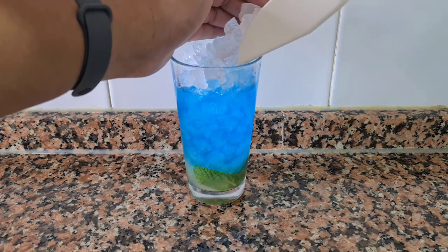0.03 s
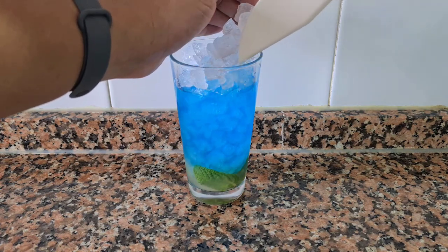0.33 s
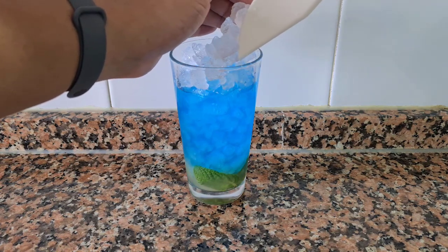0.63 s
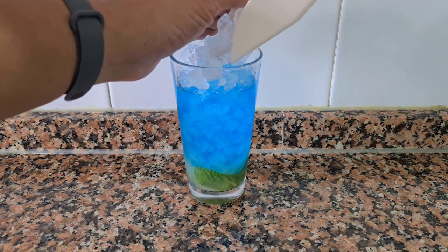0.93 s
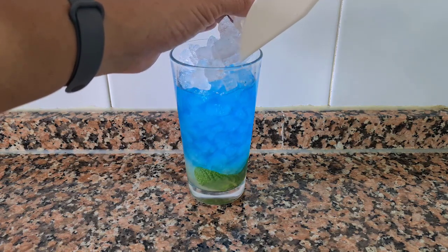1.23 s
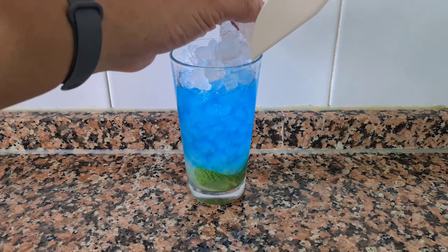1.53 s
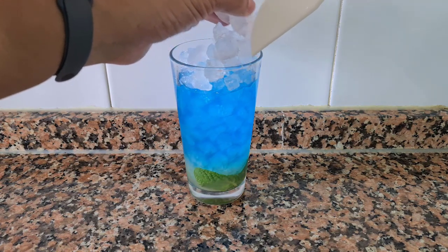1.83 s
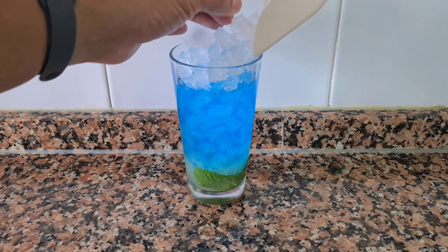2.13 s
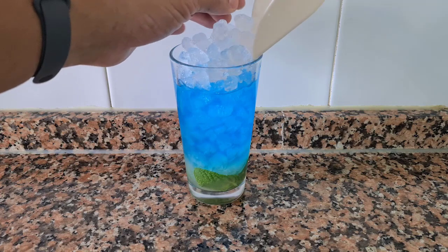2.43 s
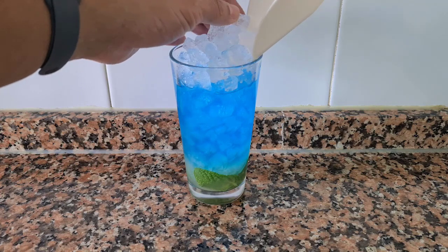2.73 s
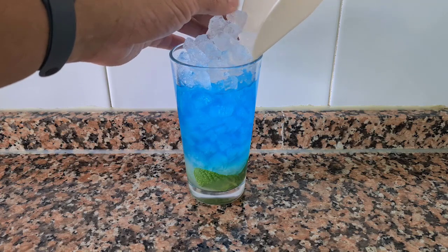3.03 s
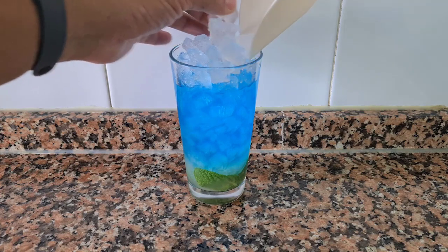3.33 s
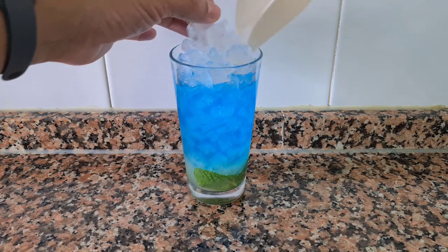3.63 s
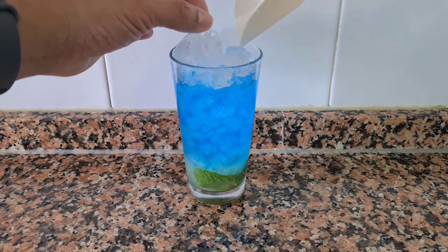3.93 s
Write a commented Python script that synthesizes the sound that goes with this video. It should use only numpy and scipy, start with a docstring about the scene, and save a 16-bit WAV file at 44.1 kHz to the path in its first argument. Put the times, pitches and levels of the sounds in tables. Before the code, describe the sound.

Crushed ice crunches and clatters as a hand pushes it from a scoop onto ice in a glass. Scattered clicks grow into busier clusters with light clinks and soft hollow bumps, heard close up in a quiet kitchen.

```python
"""Crushed ice into a full glass

A hand guides crushed ice from a plastic scoop onto the ice heaped in a glass on a stone counter.
Impacts excite the damped modes of the chunks and, faintly, of the glass. The heap crunches in swarms
of tiny fractures and settles with hollow bumps. A close stereo microphone hears it in a quiet tiled
kitchen."""
import sys
import numpy as np
from scipy import signal
from scipy.fft import rfft, irfft
from scipy.io import wavfile

SR = 44100
rng = np.random.default_rng(int(sys.argv[2]) if len(sys.argv) > 2 else 0)


def put_to_file(sound):
    """Save the sound as 16-bit audio at rate SR, in the file named by the first command-line argument."""
    columns = np.atleast_2d(sound).T  # one column per channel
    safe = np.clip(columns, -1, 1)
    whole_steps = np.round(safe * 32767)
    wavfile.write(sys.argv[1], SR, whole_steps.astype(np.int16))


N = 176400

# modes of the filled glass: f/Hz, level/dB, t60/s
GLASS_MODES = [(1385, -5, .13), (1437, -6, .14), (1629, 2.5, .2), (2010, -4, .12), (2358, -2, .12),
               (2451, 4, .21), (2560, -3.5, .22), (3557, -3, .12)]
# coherence of the two channels for near sounds: f/Hz, coherence (0-1)
COHERENCE = [(200, 0.99), (700, 0.68), (1500, 0.53), (3000, 0.34), (7000, 0), (15000, 0)]
CONTACT_RISE_S = 0.00019


def amp(db):
    """Amplitude ratio of a level in decibels."""
    return 10 ** (np.asarray(db) / 20)


def unit_rms(x):
    """Normalisation to an rms of 1."""
    return x / np.sqrt(np.mean(x ** 2) + 1e-20)


def curve_at(points, hz):
    """Interpolation on a logarithmic frequency axis."""
    f, value = np.transpose(points)
    return np.interp(np.log(hz + 1), np.log(f + 1), value)


def add(mix, start_s, sound):
    """Superposition: a stereo sound joins the mix at its onset."""
    part = mix[:, max(0, round(start_s * SR)):][:, :sound.shape[1]]
    part += sound[:, :part.shape[1]]


def band_rms(x):
    """Parseval's theorem gives the rms in the main clatter band."""
    hz = np.fft.rfftfreq(x.shape[1], 1 / SR)
    band = rfft(x)[:, (hz > 1400) & (hz < 3000)]
    return np.sqrt(2 * np.mean(np.sum(abs(band) ** 2, 1))) / x.shape[1] + 1e-12


def mic_pair(x, right_lag_s=0.000045):
    """Partial coherence: two independent signals blend, as nearby microphones agree in the bass."""
    hz = np.fft.rfftfreq(x.shape[1], 1 / SR)
    independent, right = rfft(x)
    coherence = np.clip(curve_at(COHERENCE, hz), 0, 1)
    left = coherence * right + np.sqrt(1 - coherence ** 2) * independent
    left *= np.exp(2j * np.pi * hz * right_lag_s)
    return irfft(np.array([left, right]), x.shape[1])


def room_noise(level_db=-63.5):
    """Stationary noise: a faint background, partly common to both channels."""
    # noise spectrum: f/Hz, relative density level/dB
    spectrum = [(20, -11), (50, -4), (100, 0.5), (200, -12.5), (400, -6), (700, -23.5), (2400, -9),
                (5000, -30), (11000, -30.5), (16000, -62)]
    hz = np.fft.rfftfreq(N, 1 / SR)
    white = rng.standard_normal((2, N)) + 1.2 * rng.standard_normal(N)
    noise = irfft(rfft(white) * amp(curve_at(spectrum, hz)), N)
    balance_db = np.array([[-0.5], [0]])
    return amp(level_db + balance_db) * unit_rms(noise)


def kitchen_reverb(x, onset_s=0.0027, size=22050):
    """Reverberation: a diffuse field decays exponentially, each band at its own rate."""
    # reverberation time of the kitchen: f/Hz, t60/s
    decay_times = [(150, 0.89), (600, 0.31), (2000, 0.25), (5000, 0.25), (9000, 0.22), (15000, 0.29)]
    hz, t, bands = signal.stft(mic_pair(rng.standard_normal((2, size))), SR, nperseg=256)
    decay = amp(-60 * t / curve_at(decay_times, hz)[:, None])
    tail = signal.istft(bands * decay, SR, nperseg=256)[1]
    tail *= np.clip(np.arange(tail.shape[1]) / SR / onset_s - 0.5, 0, 1)
    return signal.fftconvolve(x, tail / np.linalg.norm(tail[0]), axes=1)[:, :N]


def ice_colour(x, body_db, treble_db, sparkle_db, size=2048):
    """Minimum-phase filtering imposes the spectrum of ice, tilted for one contact."""
    # spectral envelope of all the ice: f/Hz, level/dB
    envelope = [(60, -22), (200, -16), (400, -5.5), (620, -9.5), (850, 1.5), (1000, -2.5), (1400, 5),
                (1780, -1.5), (2020, 5), (2250, 0), (2500, 6.5), (2850, 0), (3400, 1), (3850, -2.5),
                (4650, 0.5), (5350, -7.5), (6400, 4), (7300, 3), (8300, -1.5), (12500, 2), (15500, -15)]
    # centres of the body, reference, treble and sparkle bands: f/Hz
    centres = [800, 2000, 5000, 10500]
    hz = np.fft.rfftfreq(size, 1 / SR)
    tilt = list(zip(centres, [body_db, 0, treble_db, sparkle_db]))
    log_gain = np.log(amp(curve_at(envelope, hz) + curve_at(tilt, hz)))
    mirrored = np.concatenate([log_gain, log_gain[-2:0:-1]])
    taps = np.fft.ifft(np.exp(np.conj(signal.hilbert(mirrored)))).real
    return signal.fftconvolve(x, taps[None], axes=1)


def struck_body(modes, spread_db=2.5, size=12000):
    """Modal superposition: a strike at a random spot gives each damped mode its strength and phase."""
    hz, db, t60 = np.transpose(modes)[..., None]
    t, count = np.arange(size) / SR, len(modes)
    phase_spread = np.sqrt(-np.log(np.clip(curve_at(COHERENCE, hz), 0.01, 1)))
    phase = 2 * np.pi * rng.random((count, 1)) + phase_spread * rng.standard_normal((2, count, 1))
    strength = amp(db + spread_db * rng.standard_normal((2, count, 1))) * np.exp(1j * phase)
    waves = np.exp((2j * np.pi * hz - np.log(1000) / t60) * t)
    return (strength[..., 0] @ waves).real * np.minimum(t / CONTACT_RISE_S, 1)


def ice_chunk(fade_t60_s, count, size=3072):
    """Impulse response of a chunk: a crack, short random modes, scatter off glass, counter and tiles."""
    crowding, loss_db_per_cycle = 1.4, 0.15
    scatter_db, crack_db, crack_t60_s = -8, 8.5, 0.0013
    t = np.arange(size) / SR
    rank = (np.arange(count) + rng.random((2, count))) / count
    hz = rank[..., None] ** crowding * SR / np.e
    weight = hz ** ((1 - 1 / crowding) / 2)  # sparse high modes carry more each
    waves = np.sin(2 * np.pi * (hz * t + rng.random((2, count, 1))))
    modes = (weight * amp(-loss_db_per_cycle * hz * t) * waves).sum(1)
    modes /= np.sqrt(np.sum(weight ** 2, 1) / 2)
    scatter, crack = rng.standard_normal((2, 2, size))
    ringing = mic_pair(modes + amp(scatter_db) * unit_rms(scatter ** 3)) * amp(-60 * t / fade_t60_s)
    attack = 1 - np.exp(-t / CONTACT_RISE_S)
    return ringing * attack + mic_pair(crack) * amp(crack_db - 60 * t / crack_t60_s)


def fractures(size, per_s, chips=6, spread_db=3):
    """A Poisson process: tiny fractures of uneven strength each excite one of a few chips."""
    chance, choice = rng.random((2, size))
    occurs = chance <= max(per_s / SR, chance.min())
    impulses = amp(spread_db * np.minimum(rng.exponential(1, size), 4)) * occurs
    out = np.zeros((2, size))
    for chip in range(chips):
        strikes = impulses * (np.floor(choice * chips) == chip)
        response = ice_chunk(fade_t60_s=0.032, count=16)
        out += signal.fftconvolve(strikes[None], response, axes=1)[:, :size]
    return out


def ticking():
    """Shot noise: the ice ticks faintly under the fingers throughout."""
    ticks = ice_colour(fractures(N, per_s=200), body_db=-2, treble_db=4.5, sparkle_db=-17)[:, :N]
    return amp(-66) * ticks / band_rms(ticks)


def hollow_bumps(rise_s=0.009, hollow_t60_s=0.12, thump_t60_s=0.27, size=12000):
    """Damped resonance: the heap drops into place and sounds one low mode over a dull thump."""
    # bumps of the heap: t/s, level/dB, f/Hz
    bumps = [(0.867, -53.5, 419), (1.156, -58, 370), (1.472, -54, 424), (1.817, -48.5, 392),
             (1.958, -53, 398), (2.007, -49, 387), (2.066, -47, 395), (2.127, -48.5, 371), (2.17, -44, 453),
             (2.24, -46.5, 368), (2.303, -57, 195), (2.381, -54, 390), (2.456, -50, 173), (2.47, -44, 376),
             (2.506, -52.5, 163), (2.717, -51, 395), (2.774, -50.5, 379), (3.198, -57.5, 424),
             (3.24, -53.5, 430), (3.474, -46, 414), (3.549, -52.5, 426), (3.742, -46, 404),
             (3.788, -48, 392), (3.847, -54, 417), (3.896, -51, 420)]
    # spectrum of the thump: f/Hz, relative density level/dB
    spectrum = [(50, -12.5), (120, -18), (165, -1), (240, -5.5), (330, 2), (470, 2.5), (620, -21),
                (1500, -56)]
    out, t = np.zeros((2, N)), np.arange(size) / SR
    dull = amp(curve_at(spectrum, np.fft.rfftfreq(size, 1 / SR)))
    for start_s, db, hz in bumps:
        noise = irfft(rfft(rng.standard_normal((2, size))) * dull, size)
        thump = unit_rms(mic_pair(noise)) * amp(-4.5 - 60 * t / thump_t60_s)
        hollow = amp(6) * struck_body([(hz, 0, hollow_t60_s)], size=size)
        add(out, start_s, amp(db) * np.minimum(t / rise_s, 1) * (hollow + thump))
    return out


def crunches(rise_share=0.2, fall_s=0.039, size=8192):
    """Acoustic emission: the shifting heap gives off swells of fractures that also drive the glass."""
    # shifts of the heap: t/s, duration/s, level/dB, body tilt/dB, treble tilt/dB
    shifts = [(0.019, 0.037, -44, 0, -15), (0.142, 0.055, -46, -7, -15), (0.248, 0.088, -56.5, -44, -5),
              (0.41, 0.021, -64.5, -11, 23), (0.48, 0.13, -55.5, -8, 1), (0.776, 0.057, -48.5, 5.5, 2.5),
              (0.842, 0.092, -56, 11, 2), (1.098, 0.07, -41.5, -4, -6.5), (1.162, 0.091, -52.5, -13, 7.5),
              (1.171, 0.026, -37.5, -7, -8.5), (1.206, 0.0082, -37.5, -5.5, -2.5),
              (1.453, 0.067, -40, 1.5, -7), (1.67, 0.056, -49, 0.5, -6), (1.823, 0.077, -47.5, -7, -7),
              (1.903, 0.15, -53, -2, 5), (1.989, 0.071, -45, -2, -1.5), (2.097, 0.042, -37, -11, -3.5),
              (2.143, 0.12, -46, 1, -0.5), (2.264, 0.069, -36.5, -2.5, -5), (2.359, 0.098, -36.5, 0, -1),
              (2.461, 0.081, -47.5, -5, 2), (2.559, 0.085, -46, -8, -14), (2.712, 0.061, -39, -5.5, -13.5),
              (2.77, 0.051, -40, -2, -15), (3.098, 0.12, -42, -5.5, -11.5), (3.221, 0.16, -46.5, -3.5, -10),
              (3.311, 0.038, -40, -40, 4), (3.382, 0.11, -41, -0.5, -6.5), (3.459, 0.063, -42, -10, -4.5),
              (3.529, 0.066, -41, -16, -11), (3.692, 0.11, -41.5, 1.5, 0), (3.802, 0.078, -35.5, -6, -0.5),
              (3.889, 0.12, -49, 6, 6.5)]
    out, t = np.zeros((2, N)), np.arange(size) / SR
    for start_s, length_s, db, body_db, treble_db in shifts:
        rise = np.clip(t / (rise_share * length_s), 0, 1)
        fall = np.clip((length_s - t) / fall_s + 0.5, 0, 1)
        swell = fractures(size, per_s=1200) * rise * fall
        grit = ice_colour(swell, body_db, treble_db, sparkle_db=treble_db - 17.5)
        grit /= band_rms(grit[:, :round(length_s * SR)])
        glass = signal.fftconvolve(grit, struck_body(GLASS_MODES), axes=1)
        glass *= np.sqrt(length_s * SR) / np.linalg.norm(glass[0])
        add(out, start_s, amp(db - 4.5) * grit)
        add(out, start_s, amp(db - 15) * glass)
    return out


def singing_glass(scraping, bandwidth_hz=22):
    """Forced vibration: scraping drives the two strongest modes of the glass."""
    strongest = sorted(GLASS_MODES, key=lambda mode: -mode[1])[:2]
    return sum(amp(db) * signal.lfilter(*signal.iirpeak(hz, hz / bandwidth_hz, fs=SR), scraping)
               for hz, db, _ in strongest)


def clinks(t60_s=0.071):
    """Free vibration: a hard contact sounds a clear note that the surrounding ice soon damps."""
    # hard contacts: t/s, level/dB, f/Hz
    contacts = [(0.253, -49, 6200), (0.279, -36, 2460), (0.277, -37, 7130), (0.455, -28.5, 2543),
                (0.453, -43, 6080), (1.144, -39, 3270), (1.18, -30, 3220), (1.18, -47, 6135),
                (2.077, -30, 4270), (2.098, -42, 6100), (2.4, -40, 2180), (2.465, -35, 2040),
                (2.464, -37, 6130), (2.485, -27, 1377), (2.502, -35, 1370), (2.546, -34.5, 1396),
                (2.717, -29.5, 2002), (3.312, -29.5, 3536), (3.743, -32.5, 6650), (3.814, -39, 6540)]
    out = np.zeros((2, N))
    for start_s, db, hz in contacts:
        add(out, start_s, struck_body([(hz, db, t60_s)]))
    return out


def knocks(lead_in_s=0.006, impact_s=0.008):
    """Impact excitation: chunks strike the heap or the glass, which rings on."""
    # impacts: t/s, level/dB, body tilt/dB, treble tilt/dB, sparkle tilt/dB, glass ring offset/dB
    impacts = [(0.0217, -38.5, -17, -31, -42, -7), (0.0314, -36.5, -15, -10, -35, -27),
               (0.1526, -46, -25, -20, -42, -19), (0.187, -43, -7, 2.5, -27, -17),
               (0.192, -40.5, -8.5, -27, -24, -21), (0.2363, -51, -1.5, -9, -34, -15),
               (0.2779, -40, -47, 8.5, -6.5, -32), (0.3274, -59.5, -33, 18, 8, -16),
               (0.3548, -48, -16, -4, -11, -4), (0.4357, -46.5, -3, 3, -9, -2),
               (0.4554, -34.5, -14, 7.5, -1.5, -13), (0.4819, -38.5, -10.5, 1, -53, -23),
               (0.5753, -46, -6, 0, -12, -10), (0.5982, -44, -6.5, -11, -21, -6.5),
               (0.6632, -50.5, -17, 15, -8.5, -22), (0.6936, -54, -7, 16, -12, -12),
               (0.7132, -52, -16, 11.5, 4, -18), (0.7659, -52.5, -7, 8, 1, 2),
               (0.8004, -37.5, -15, -2, -41, -5), (0.8117, -32.5, -10, -6, -24, -16),
               (0.9061, -37, -31, -6, -21.5, -13), (0.922, -38, -11, -7, -24, -33),
               (1.0204, -48, -1.5, 0.5, -25, 1), (1.059, -50, -3, 1, -21, -0.5),
               (1.1064, -45, 4.5, 8, -29, -6), (1.426, -56, -28, 6, -4, -2),
               (1.4453, -46.5, -33, -1, -15, -12), (1.471, -29.5, -8, -5, -19, -3),
               (1.487, -37, -8, 0, -23, -22), (1.525, -42, -8, -5, -44, -28),
               (1.6018, -57, 9.5, 10, -22, -14), (1.6906, -47, 5.5, -6, -40, 1),
               (1.709, -42, -40, -6, -59, -10), (1.75, -46.5, -8, -9, -45, -21),
               (1.826, -55.5, 22, 20, -4.5, 5), (1.906, -41, 3.5, 2, -20, 4.5),
               (1.9143, -32, -11.5, -14, -24, -11), (1.9632, -53, -16, 23, -29, -1),
               (2.014, -42, -10, -25, -26, 8.5), (2.065, -47, -8, 0, -28, 8.5),
               (2.0771, -30.5, -4, 7.5, -17.5, -14), (2.0973, -30, -4, 2, -16.5, -0.5),
               (2.1595, -38.5, -11, 3, -16, -2), (2.1992, -54, -12, 21, 9, -19),
               (2.21, -44.5, -33, 13, -25, -12), (2.3017, -31, -5, -6, -20, 6.5),
               (2.373, -31, 2, -10.5, -32, -20), (2.389, -34, -3, -11, -17, -7),
               (2.3995, -25, -23, -14, -24, -21), (2.4388, -38, 10, -15, -17, -17),
               (2.464, -27.5, -8, -16, -26, -23), (2.484, -25, -19, -19, -22, -15),
               (2.5987, -47.5, -14, -20, -22, 2.5), (2.6451, -41, -7, -17, -22, -27),
               (2.6921, -39.5, -6, -50, -39, -17), (2.7168, -27.5, -7.5, -12, -18, -12),
               (2.739, -37, -2.5, -3, -27, -21), (2.7553, -37.5, -3, -12, -26, -23),
               (2.797, -45.5, 9, 5.5, -8.5, -21), (2.8951, -46, -13, -60, -50, -4),
               (2.9288, -51.5, 10, 17.5, -4, -3), (3.012, -44, -1, -10, -22, -13),
               (3.115, -41.5, -3, -40, -47, -10), (3.133, -40, -10, -53, -45, -14),
               (3.227, -37.5, -6, -10, -29, -23), (3.289, -31.5, -8.5, -5, -29, -6),
               (3.3107, -31, -15, 1.5, -19.5, -0.5), (3.3258, -31.5, -12, -16, -27, -4),
               (3.335, -32.5, -3, -8, -24, -9), (3.4076, -30, -17, -10, -41, -9),
               (3.429, -42, -7, 9, -17, -10), (3.4801, -38.5, 6.5, 8, -23, 1),
               (3.495, -38, -19, 5, -35, -21), (3.5341, -46, 13.5, 12, -2.5, -2),
               (3.554, -37, 4.5, 0, -21, -4), (3.5621, -36.5, -4, 4, -15.5, -22),
               (3.696, -38.5, -4, -6, -27, -4.5), (3.7432, -45, -14, 16.5, 0, 5),
               (3.814, -25.5, -7.5, -5, -16.5, -7), (3.852, -30.5, -4, -13, -37, 1),
               (3.9453, -29, -11, -26, -20, -0.5), (3.9502, -39, 9.5, 16.5, -1.5, -25)]
    out, lead_in_size = np.zeros((2, N)), round(lead_in_s * SR)
    for start_s, db, *tilt_db, ring_db in impacts:
        hit = ice_colour(ice_chunk(fade_t60_s=0.06, count=26), *tilt_db)
        add(out, start_s, amp(db - 3) * hit / band_rms(hit[:, :round(impact_s * SR)]))
        add(out, start_s, amp(db + ring_db - 8.5) * struck_body(GLASS_MODES))
        # a brief swell of noise softens the start of each knock
        noise = mic_pair(rng.standard_normal((2, 1024)))[:, :lead_in_size]
        lead_in = ice_colour(noise * np.linspace(0, 1, lead_in_size), *tilt_db)
        add(out, start_s - lead_in_s, amp(db - 15.5) * lead_in / band_rms(lead_in[:, :lead_in_size]))
    return out


def scene():
    """Superposition of the direct sound of ice and glass, its reverberation and the room noise."""
    scraping = crunches() + ticking()
    direct = knocks() + clinks() + scraping + amp(-2.5) * singing_glass(scraping) + hollow_bumps()
    return direct + amp(-7) * kitchen_reverb(direct) + room_noise()


def record(dry):
    """Band limiting: a linear-phase low-pass filter removes the highest treble."""
    cutoff_hz = 16200
    taps = signal.firwin(255, cutoff_hz, window=("kaiser", 9), fs=SR)
    return signal.oaconvolve(dry, taps[None], "same")


dry = scene()
out = record(dry)
put_to_file(out)
```